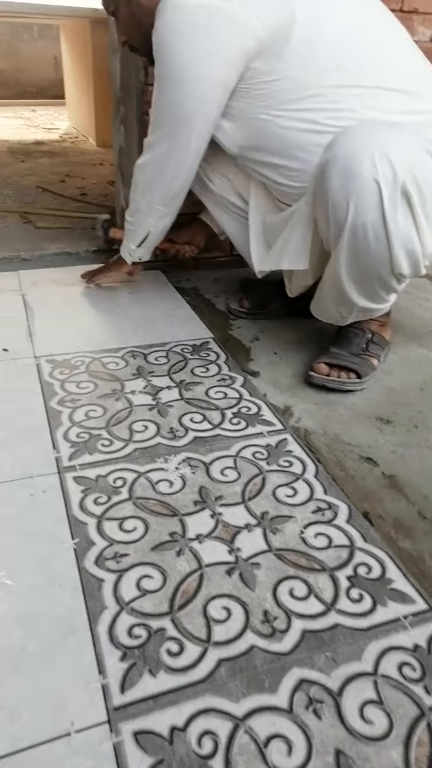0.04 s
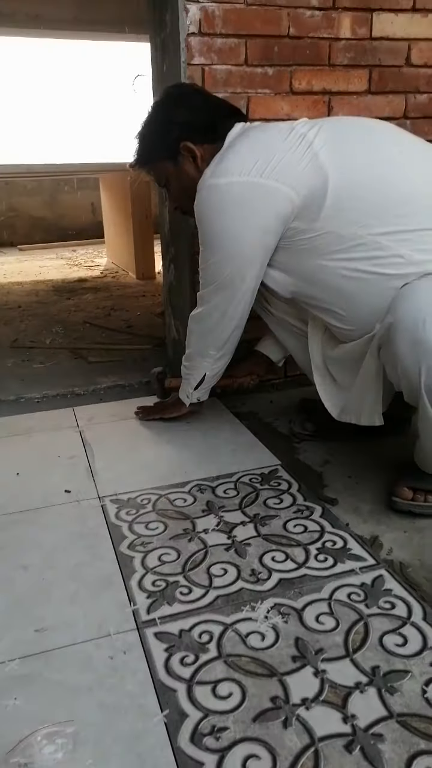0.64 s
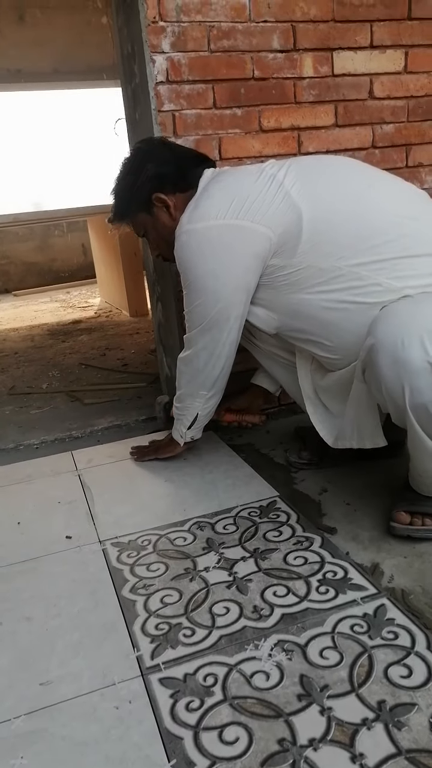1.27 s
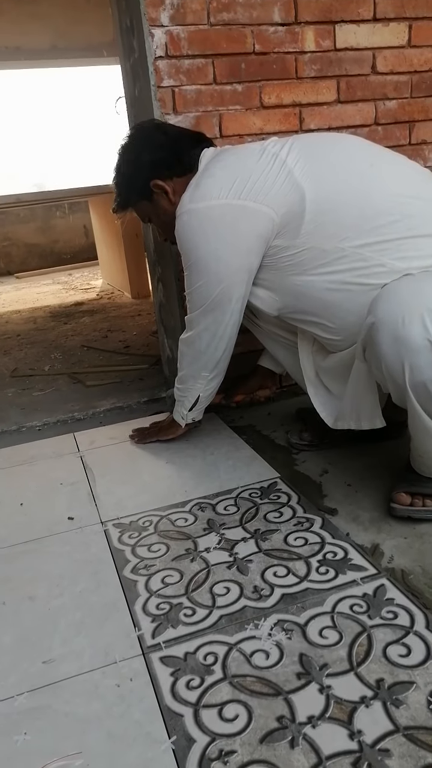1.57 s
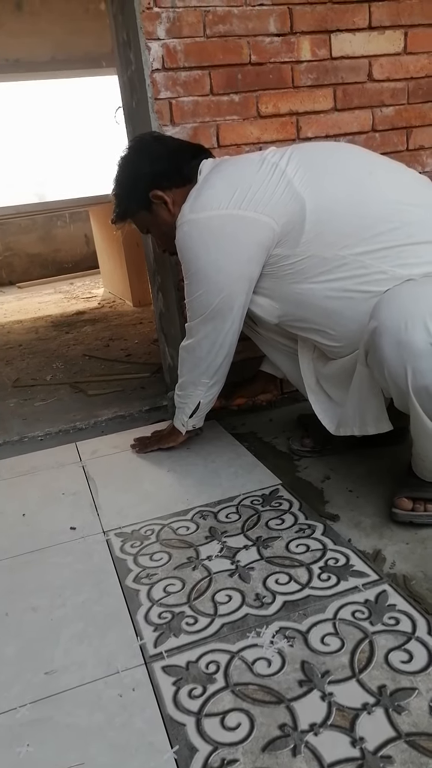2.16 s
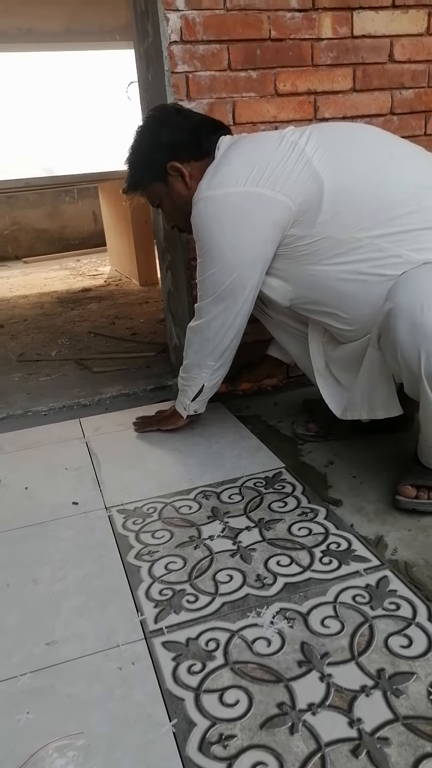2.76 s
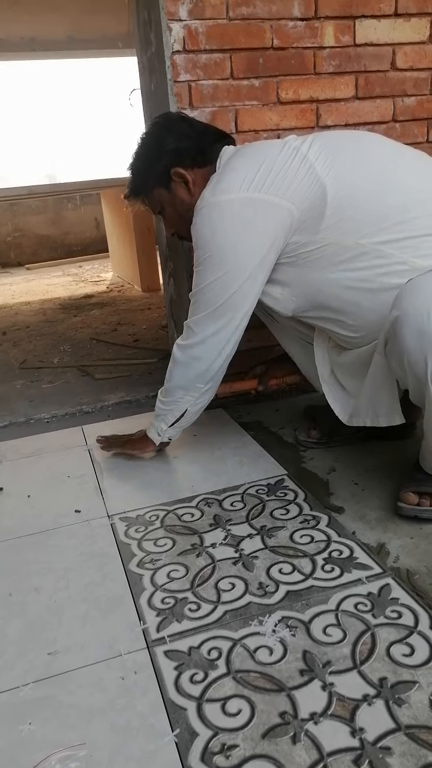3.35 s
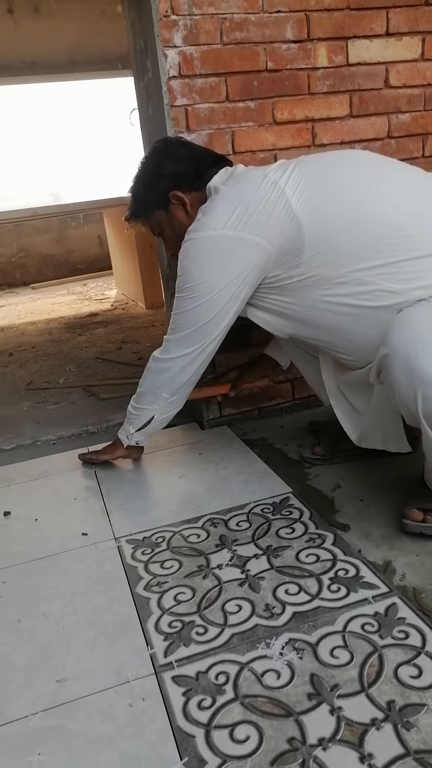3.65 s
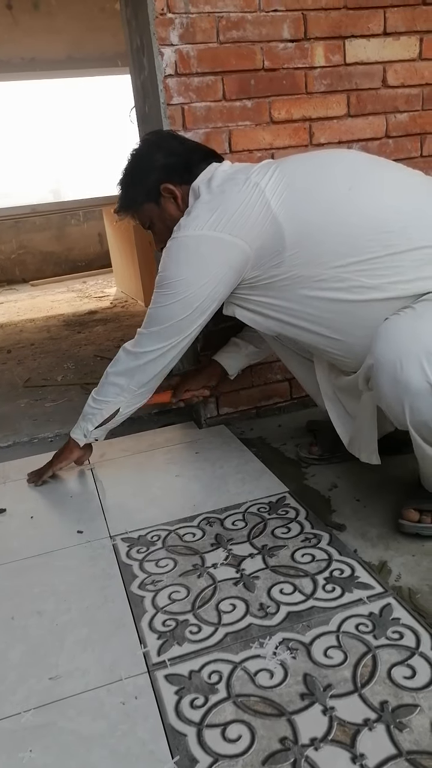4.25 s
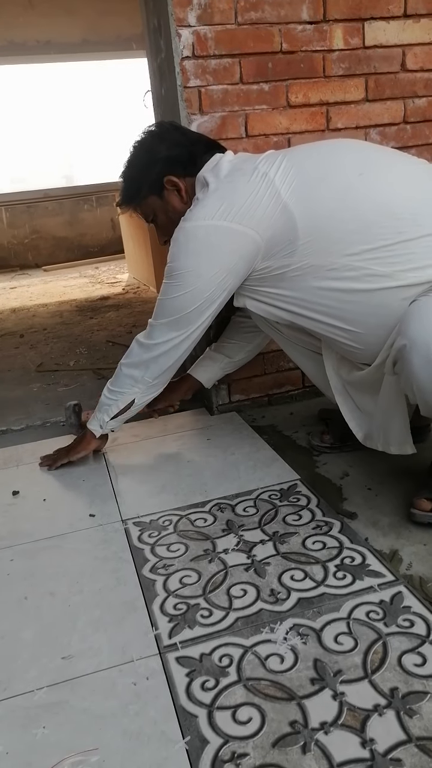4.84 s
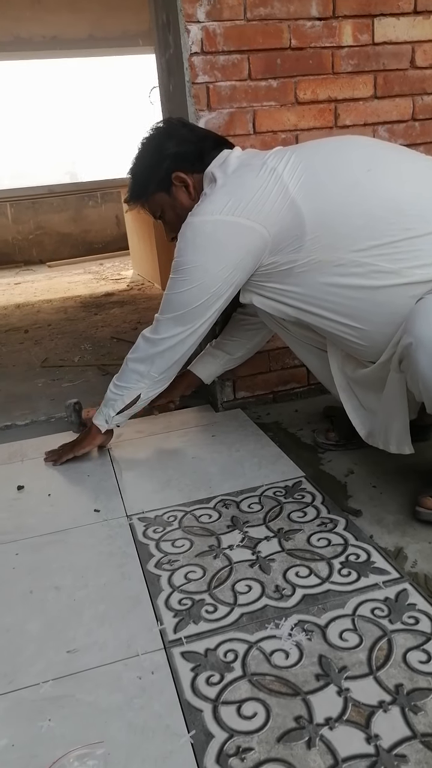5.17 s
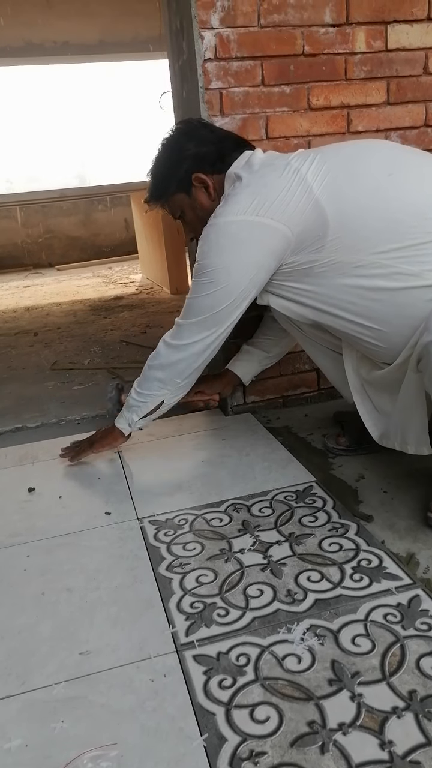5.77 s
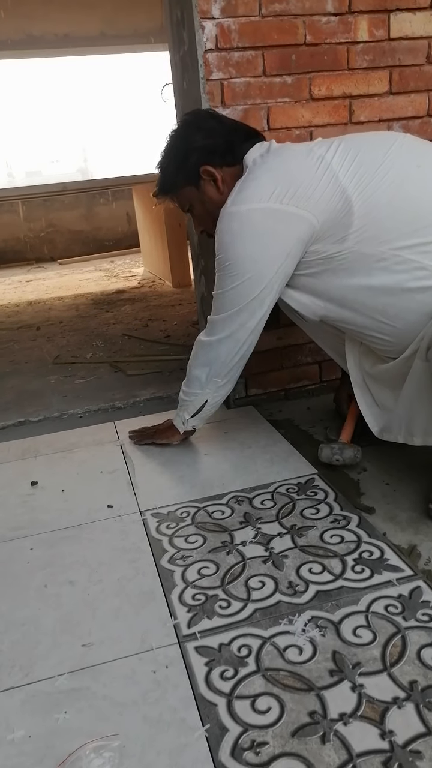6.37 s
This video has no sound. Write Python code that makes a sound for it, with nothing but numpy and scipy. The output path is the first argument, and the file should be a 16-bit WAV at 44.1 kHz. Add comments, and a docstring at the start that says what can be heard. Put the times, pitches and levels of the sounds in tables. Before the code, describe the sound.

Wind rumbles softly on a hand-held microphone, with a couple of low bumps, as a mallet lightly knocks a floor tile into place. A dozen quick, dull taps fade away, there is a gap, and four firmer ones follow while a faint distant rush swells. The bare, partly open room adds a short echo, and nearly everything is heard on the right side.

```python
"""A bare brick room, open on one side: a tiler beds ceramic floor tiles with light mallet taps, one
hand pressing flat. Wet mortar damps each tap to a short knock; walls and ceiling throw it back, and
a brief tail follows. Air buffets the hand-held microphone, whose left port is almost deaf.
Behind it all: a distant rush that swells late, faint far tones, outdoor rumble and microphone hiss."""
import sys
import numpy as np
from scipy import signal
from scipy.fft import rfft, irfft, next_fast_len
from scipy.io import wavfile
from scipy.ndimage import uniform_filter1d

SR = 44100
rng = np.random.default_rng(int(sys.argv[2]) if len(sys.argv) > 2 else 0)


def to_wav(s):
    """Save 16-bit WAV."""
    ch = np.atleast_2d(s).T  # columns
    pcm = np.round(np.clip(ch, -1, 1) * 32767)  # PCM
    wavfile.write(sys.argv[1], SR, pcm.astype(np.int16))


N = 287135
TIME = np.arange(N) / SR


def from_db(db):
    """Decibels to gain."""
    return 10 ** (np.asarray(db) / 20)


def at_hz(points, hz, column=1):
    """Interpolate a table column over log frequency."""
    table = np.array(points, float)
    return np.interp(np.log(np.maximum(hz, 1)), np.log(table[:, 0]), table[:, column])


def cut(x, hz, kind, order=2):
    """Causal low-, high- or band-pass."""
    return signal.sosfilt(signal.butter(order, np.clip(hz, 10, .45 * SR), kind, fs=SR, output="sos"), x)


def colour(x, spectrum):
    """Filter by a table of (frequency [Hz], gain [dB])."""
    size = next_fast_len(N)
    gain = from_db(at_hz(spectrum, np.fft.rfftfreq(size, 1 / SR)))
    return irfft(rfft(x, size) * gain, size)[:N]


def noise(spectrum):
    """Steady shaped noise, rms 1."""
    x = colour(rng.standard_normal(N), spectrum)
    return x / np.std(x)


def ring(t, hz, t60_s, rise_s):
    """Damped mode with a short rise."""
    return np.sin(2 * np.pi * hz * t) * np.exp(-np.log(1000) * t / t60_s) * (1 - np.exp(-t / rise_s))


def add(out, start_s, x):
    """Mix x into out from start_s on."""
    i = min(max(int(round(start_s * SR)), 0), len(out))
    out[i:i + len(x)] += x[:len(out) - i]


# bending modes of the bedded tile, per spot: (frequency [Hz], level [dB], t60 [s])
TILE_MODES = {"edge": [(250, 0.5, 0.02), (300, 2.5, 0.025), (458, -10.5, 0.03), (640, -19, 0.027),
              (1000, 0.5, 0.0039), (1025, -24, 0.08), (1050, -26, 0.056), (1824, -18, 0.019),
              (1990, -17.5, 0.019), (2275, -18, 0.018), (2704, -25, 0.026), (4810, -18.5, 0.011)],
              "middle": [(267, 10, 0.024), (371.4, 2, 0.032), (511, -10.5, 0.042), (687, -12, 0.035),
              (942, -8, 0.025), (1380, -8.5, 0.0055), (1973, -19, 0.022), (2570, -12, 0.0087),
              (4900, -13, 0.012)], "joint": [(279.5, -2, 0.048), (336, 2, 0.032), (517, 5, 0.016),
              (647, -6.5, 0.017), (858, -14, 0.036), (1260, -11, 0.0047), (1900, -11, 0.0098),
              (2070, -24, 0.017), (2530, -17, 0.013), (4600, -23, 0.0055), (4810, -17, 0.0071)]}
# mallet force, per spot: (rise time [s])
CONTACT_S = {"edge": .0013, "middle": .0016, "joint": .0015}

def tile_knock(spot, hardness_db, tick_db, scatter_db=1.94, detune=.007):
    """One tap, direct and as sent into the room; harder contact favours the high modes."""
    hz, level_db, t60_s = np.transpose(TILE_MODES[spot])
    level_draw, pitch_draw = rng.standard_normal((2, len(hz)))
    tilt_db = hardness_db * np.log10(hz / hz[0])
    gains = from_db(level_db + tilt_db + tick_db * (hz == hz.max()) + scatter_db * level_draw)
    detuned_hz = hz * (1 + detune * pitch_draw)
    modes = gains[:, None] * ring(TIME[:SR // 2], detuned_hz[:, None], t60_s[:, None], CONTACT_S[spot])
    signs = (-1) ** np.arange(len(hz))  # adjacent modes radiate to the walls in antiphase
    direct_and_outward = np.array([modes.sum(axis=0), signs @ modes])
    return cut(direct_and_outward, hz=123, kind="high")  # a small plate radiates little bass


# mallet taps: (time [s], level [dB], hardness [dB/decade], top-mode tick [dB], spot)
TAPS = [(0.25, -37, 8, -10, "edge"), (0.4959, -36, 6.5, -5, "edge"), (0.7173, -29.5, -3, 2, "edge"),
        (0.9433, -28.5, -1, 1.5, "edge"), (1.1702, -30.5, -0.5, 3, "edge"),
        (1.6989, -35, 5.5, -5.5, "middle"), (1.947, -32, 0.5, -7, "middle"),
        (2.1954, -36, 3.5, -2, "middle"), (2.404, -37, 1.5, 4, "middle"),
        (2.6097, -40.5, -4.5, 4, "middle"), (2.8222, -52.5, 10.5, -7, "middle"),
        (3.0351, -38, -5, -4, "middle"), (4.8974, -26.5, -1.5, -14, "joint"),
        (5.2168, -22, 1.5, 1, "joint"), (5.525, -24, -0.5, -10, "joint"), (5.7440, -24.5, -7, 8, "joint")]
# early reflections, per spot: (delay [s], gain [dB])
ECHOES = {"edge": [(0.0101, -10.5), (0.0176, -15), (0.0204, -9), (0.0382, -24), (0.0419, -10.5),
          (0.0639, -16)], "middle": [(0.0104, -17), (0.0176, -5.5), (0.0204, -11.5), (0.0314, -17),
          (0.0422, -5), (0.0539, -8)], "joint": [(0.0138, -9.5), (0.02, -8), (0.0377, -3.5), (0.0407, -8.5),
          (0.0585, -8.5)]}

def mallet_taps(echo_cutoff_cycles=15.3):
    """Each knock with its spot's echoes and tail; later echoes are duller."""
    out = np.zeros(N)
    spot_tails = {spot: room_tail(spot) for spot in TILE_MODES}
    for time_s, level_db, hardness_db, tick_db, spot in TAPS:
        direct, outward = from_db(level_db) * tile_knock(spot, hardness_db, tick_db)
        add(out, time_s, direct)
        for delay_s, echo_db in ECHOES[spot]:
            echo = cut(direct, echo_cutoff_cycles / delay_s, "low", order=1)
            add(out, time_s + delay_s, from_db(echo_db) * echo)
        # the mallet never hits quite the same point: part of the tail is new
        tail = 0.96 * spot_tails[spot] + .5 * room_tail(spot)
        add(out, time_s, signal.fftconvolve(outward, tail))
    return out


# diffuse tail: (frequency [Hz], t60 [s], edge gain [dB], middle gain [dB], joint gain [dB])
ROOM_BANDS = [(151, 0.15, -13, -16, -2), (218, 0.68, -3, -6, -5.5), (335, 0.7, -23, -15.5, -7.5),
              (465, 0.26, 3, -7, -7), (640, 0.46, 3, 4, -6), (827, 0.74, 0, -1.5, -0.5),
              (1046, 0.3, 8.5, -2, 5.5), (1370, 0.33, 2, 8.5, 2), (1830, 0.29, -13.5, -9, -16.5),
              (2980, 0.27, -0.5, -9, 4.5), (5000, 0.25, -5.5, -12, -9)]

def room_tail(spot, delay_s=0.0011, build_s=0.012):
    """Impulse response: dense reflections build, then decay by third-octave band."""
    t, tail = TIME[:SR * 3 // 4], 0
    gain_column = 2 + list(TILE_MODES).index(spot)
    edges_hz = 110 * 2 ** (np.arange(20) / 3)
    build = 1 - np.exp(-np.maximum(t - delay_s, 0) / build_s)
    for low, high in zip(edges_hz, edges_hz[1:]):
        hz = np.sqrt(low * high)
        decay = np.exp(-np.log(1000) * t / at_hz(ROOM_BANDS, hz))
        band = cut(rng.standard_normal(len(t)), [low, high], "band") * build * decay
        unit_gain = np.sqrt(2 * (high - low) / SR / np.sum(band ** 2))
        tail = tail + band * unit_gain * from_db(at_hz(ROOM_BANDS, hz, gain_column))
    return tail


# pressure swings on the port: (frequency [Hz], relative density [dB])
BUFFET_SPECTRUM = [(6, -6), (13, 6), (22, -2), (35, -20.5), (55, -12), (90, -30.5), (160, -37.5),
                   (400, -123.5)]
# hand sways: (peak time [s], level [dB])
SWAYS = [(0.16, -29.5), (0.68, -35.5), (2.05, -46), (3.45, -43.5), (4.049, -39)]

def air_buffet(draught_db=-39.5, ease_db_per_s=1.54, carry_db=-35.5, sway_s=0.097):
    """Air on the port: an easing draught, the microphone carried and settling, brief hand sways."""
    rise_s, carry_until_s, settle_s = 0.077, 0.76, 0.27
    air = noise(BUFFET_SPECTRUM)
    air /= np.sqrt(uniform_filter1d(air ** 2, size=SR // 4))
    draught = from_db(draught_db - ease_db_per_s * TIME)
    carry = from_db(carry_db) * (1 - np.exp(-TIME / rise_s))
    carry *= np.exp(-np.maximum(TIME - carry_until_s, 0) / settle_s)
    sways = sum(from_db(db) * np.exp(-((TIME - peak_s) / sway_s) ** 2) for peak_s, db in SWAYS)
    return air * (draught + carry + sways)


# bumps on the case: (time [s], level [dB], frequency [Hz], t60 [s])
BUMPS = [(0.165, -16.5, 99.3, 0.071), (0.644, -4, 11.7, 0.12), (0.679, -19.5, 116, 0.04),
         (3.985, -29, 71, 0.18)]
# rustles: (time [s], length [s], level [dB])
RUSTLES = [(0.166, .04, -76), (0.639, 0.061, -47.5), (3.973, 0.072, -83)]
# rustle noise: (frequency [Hz], relative density [dB])
RUSTLE_SPECTRUM = [(100, 17), (250, 25), (500, 2), (900, -5), (2000, -31), (5000, -61), (10000, -64)]

def handling():
    """The hand bumps the microphone softly; sleeve and grip rustle."""
    bumps, rubbing = np.zeros((2, N))
    for time_s, level_db, hz, t60_s in BUMPS:
        add(bumps, time_s, from_db(level_db) * ring(TIME[:SR], hz, t60_s, rise_s=0.0093))
    for time_s, length_s, level_db in RUSTLES:
        add(rubbing, time_s, from_db(level_db) * np.hanning(int(length_s * SR)))
    return bumps + rubbing * noise(RUSTLE_SPECTRUM)


# distant rush: (frequency [Hz], relative density [dB])
RUSH_SPECTRUM = [(300, 10.5), (600, -3.5), (1000, 0), (1500, -12), (2700, -13), (3800, -21), (4500, -13.5),
                 (5200, -11.5), (6000, -26.5), (9000, -28.5)]

def far_rush(rest_db=-78, swell_db=-61.5, sizzle_db=-80):
    """A broad distant rush swells, topped by a narrow sizzle that slides upward."""
    start_s, attack_s, hold_s, release_s = 4.61, 0.97, 0.54, 1.0
    low_hz, high_hz, climb_at_s, climb_s = 4490, 5310, 5.63, 0.11
    swell = np.interp(TIME, start_s + np.cumsum([0, attack_s, hold_s, release_s]), [0, 1, 1, 0])
    climb = .5 + .5 * np.tanh((TIME - climb_at_s) / climb_s)
    centre_hz = low_hz + (high_hz - low_hz) * climb
    grain = cut(rng.standard_normal(N), hz=140, kind="low")
    sizzle = grain / np.std(grain) * np.sin(2 * np.pi * np.cumsum(centre_hz) / SR)
    rush = (from_db(rest_db) + from_db(swell_db) * swell) * noise(RUSH_SPECTRUM)
    return rush + from_db(sizzle_db) * swell ** 4.5 * sizzle


# far tones: (time [s], length [s], start pitch [Hz], level [dB])
FAR_TONES = [(0, 0.19, 920, -67.5), (1.292, 0.39, 640, -71), (1.781, 0.66, 980, -71),
             (2.448, 0.19, 590, -67.5), (3.241, 0.2, 612, -70), (4.15, 1, 152, -59)]

def far_tones(sag=0.061, waver_depth=0.0208):
    """Thin wavering tones from outside, each swelling and fading as its pitch sags."""
    out = np.zeros(N)
    for time_s, length_s, start_hz, level_db in FAR_TONES:
        count = int(length_s * SR)
        waver = cut(rng.standard_normal(SR), hz=41.2, kind="low")[:count]
        hz = start_hz * np.linspace(1, 1 - sag, count) * (1 + waver_depth * waver / np.std(waver))
        envelope = from_db(level_db) * np.sin(np.linspace(0, np.pi, count))
        add(out, time_s, envelope * np.sin(2 * np.pi * np.cumsum(hz) / SR))
    return out


# outdoor rumble: (frequency [Hz], relative density [dB])
RUMBLE_SPECTRUM = [(26, -38.5), (45, -8), (146, -13.5), (191, -23.5), (238, -23), (263, -25), (296, -28.5),
                   (466, -35.5), (589, -35.5), (652, -38.5), (2500, -50.5), (3250, -73), (5500, -120)]
# microphone hiss with port resonances: (frequency [Hz], relative density [dB])
HISS_SPECTRUM = [(1500, -21.5), (2500, -2), (3100, 0.5), (3870, -8.5), (5200, -3), (6300, -7), (7900, -11),
                 (10000, -7.5), (11000, -7), (14000, -5.5), (14900, -1.5), (15300, -11.5), (15750, -8)]

def background(rumble_db=-54.5, hiss_db=-75):
    """Steady outdoor rumble and microphone hiss."""
    return from_db(rumble_db) * noise(RUMBLE_SPECTRUM) + from_db(hiss_db) * noise(HISS_SPECTRUM)


# left port noise relative to the right: (frequency [Hz], gain [dB])
LEFT_NOISE_GAIN = [(60, -18), (110, -27.5), (200, -18.5), (380, -13.0), (700, -8.5), (1290, -8.5),
                   (2380, -7.5), (4400, -8), (8120, -7), (15000, -10)]

def scene(left_leak_db=-49.5):
    """The right port hears everything; the left gives little but its own noise."""
    sound = mallet_taps() + air_buffet() + handling() + far_tones() + far_rush()
    left = from_db(left_leak_db) * sound + colour(background(), LEFT_NOISE_GAIN)
    return np.array([left, sound + background()])


def record(dry, cutoff_hz=15750):
    """Steep elliptic low-pass."""
    return signal.sosfilt(signal.ellip(10, .2, 70, cutoff_hz, fs=SR, output="sos"), dry)


dry = scene()
out = record(dry)
to_wav(out)
```